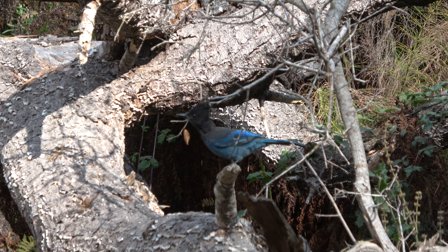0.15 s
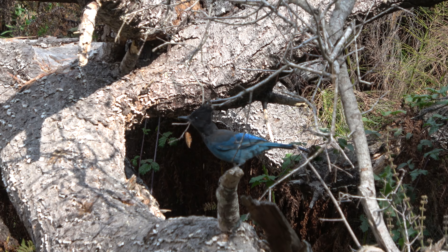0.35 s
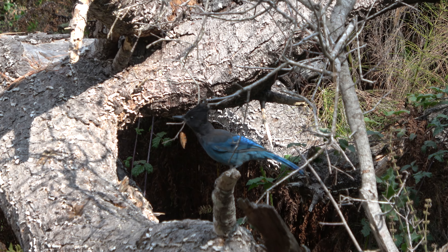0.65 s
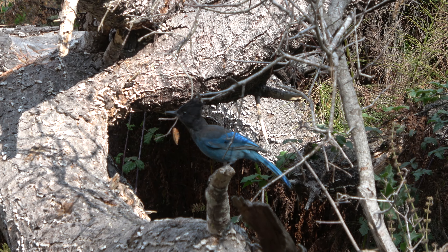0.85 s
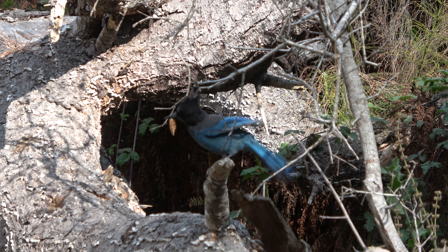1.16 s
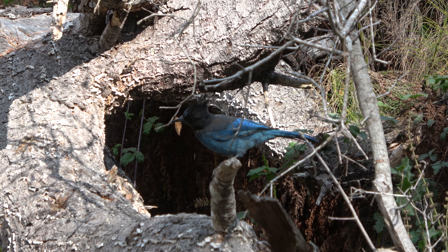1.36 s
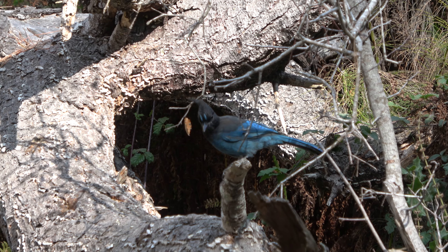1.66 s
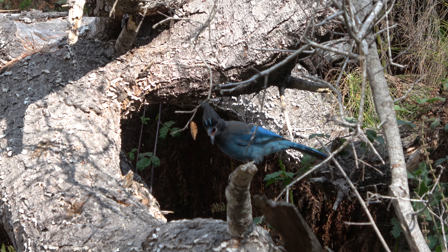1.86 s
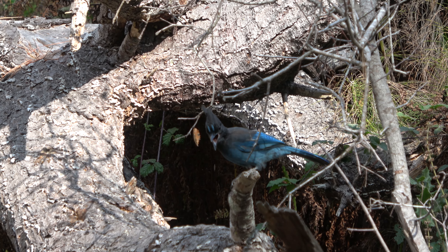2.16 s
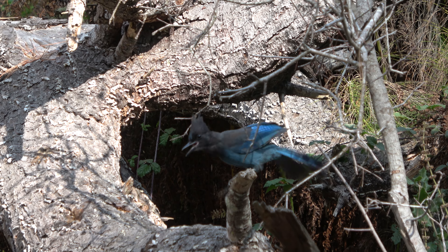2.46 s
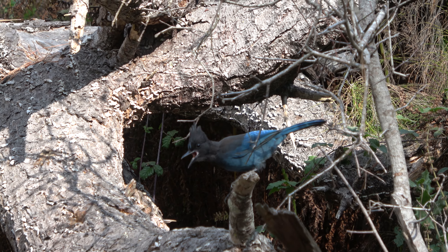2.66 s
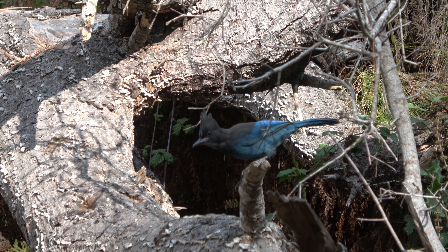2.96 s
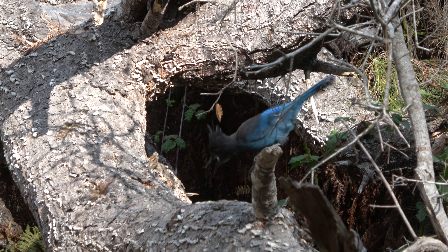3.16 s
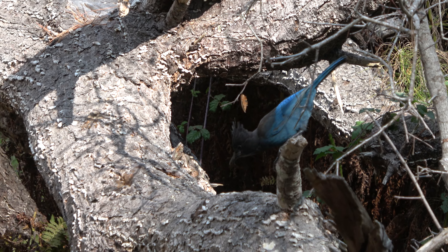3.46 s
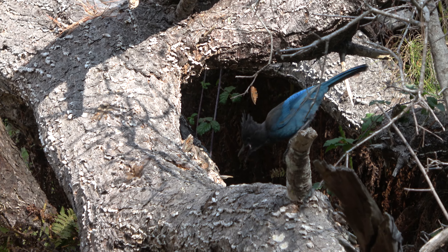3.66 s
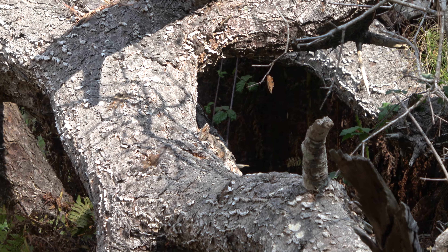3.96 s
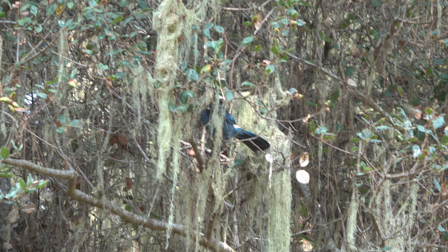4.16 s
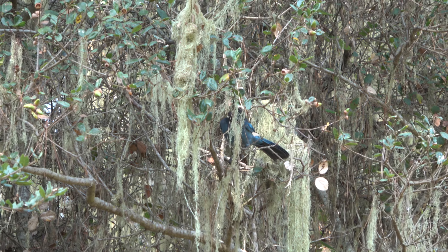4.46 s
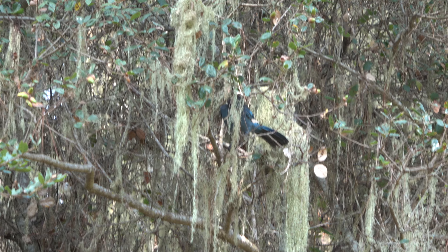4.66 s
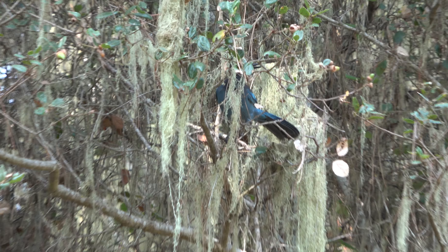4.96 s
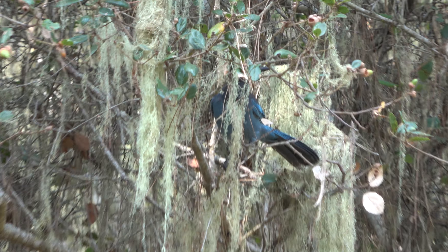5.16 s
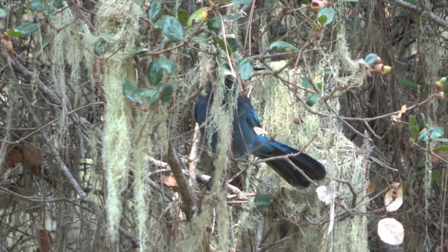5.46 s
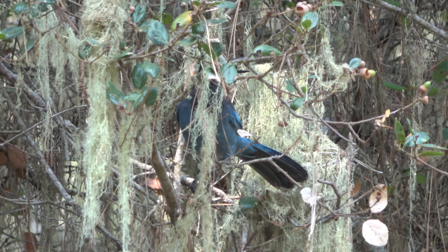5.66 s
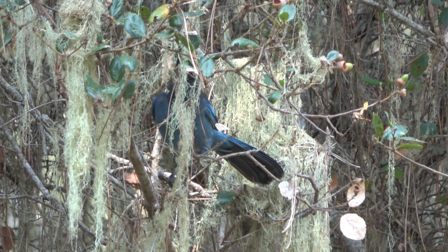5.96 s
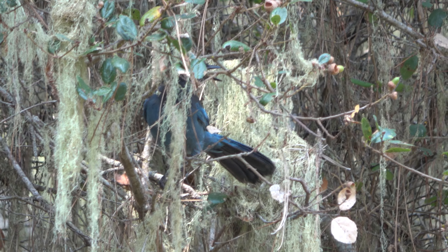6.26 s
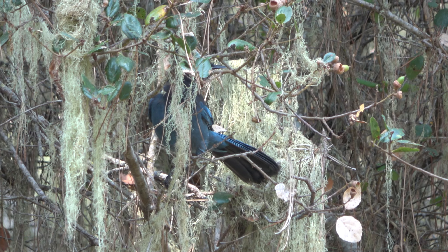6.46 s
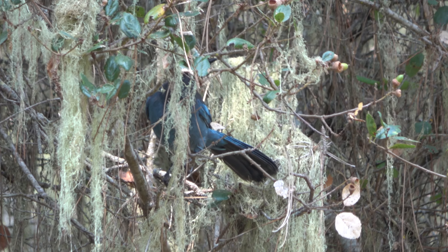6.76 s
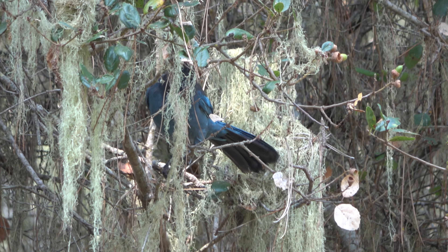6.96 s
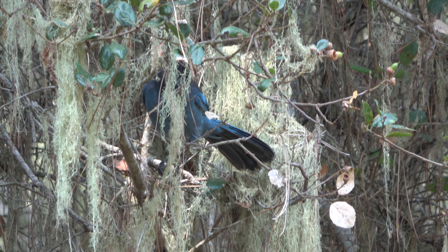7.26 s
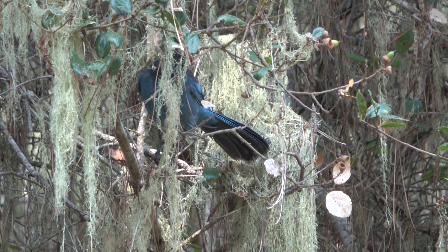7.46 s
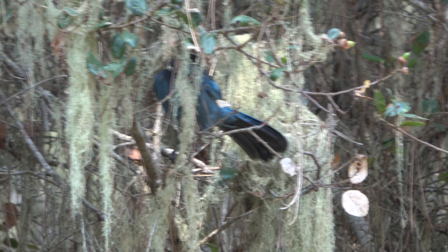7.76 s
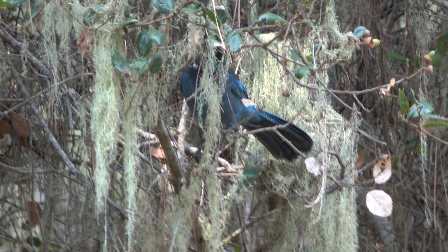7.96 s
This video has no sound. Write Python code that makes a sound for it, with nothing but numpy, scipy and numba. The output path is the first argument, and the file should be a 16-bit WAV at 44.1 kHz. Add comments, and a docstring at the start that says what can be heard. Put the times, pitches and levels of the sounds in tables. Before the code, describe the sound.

A jay gives four harsh, rattling rasps close by, then six softer ones from farther off in a forest over faint traffic rumble and engine drone.

```python
"""A jay rasps four times from a perch in a hollow log, then six times from a lichen-hung tree further off.
Its syrinx (voice organ) snaps about a thousand times a second, in bursts that flutter near 120 a second.
Windpipe, gullet, throat and beak ring to these snaps and to breath noise, and the trees echo each call.
Behind it lie far traffic made of filtered noise, a droning engine of two gliding tones, faint ticks
(ringing noise bursts) and chirps (gliding tones), and microphone hiss."""
import sys
import numpy as np
from scipy import signal
from scipy.fft import rfft, irfft, next_fast_len
from scipy.io import wavfile
from scipy.ndimage import uniform_filter1d
from numba import njit

SR = 44100
rng = np.random.default_rng(int(sys.argv[2]) if len(sys.argv) > 2 else 0)


def digitize_waveform(pressure):
    """Quantize a signal to 16-bit integers and store it at the path in sys.argv[1].

    Rows of a 2-D input are taken as channels; values are limited to [-1, 1].
    """
    field = np.atleast_2d(pressure).T
    bounded = np.clip(field, -1, 1)
    quanta = np.round(bounded * 32767).astype(np.int16)
    wavfile.write(sys.argv[1], SR, quanta)


N = 358091
T = np.arange(N) / SR
SCENE_CHANGE_S = 4.092  # before this we hear the log, from then on the tree
LEFT_RIGHT = np.array([[1], [-1]])  # a side signal is added on the left and subtracted on the right


def undb(db):
    """Turn dB into a gain."""
    return 10 ** (np.asarray(db) / 20)


def level(x, db):
    """Scale a sound to an rms level in dB."""
    return x * undb(db) / np.sqrt(np.mean(x ** 2))


def colour(x, points):
    """Filter by a gain curve drawn through (f/Hz, gain/dB) points."""
    hz, db = np.transpose(points)
    size = next_fast_len(x.shape[-1])
    f = np.arange(size // 2 + 1) * SR / size + 1  # 1 Hz up, so that the log exists
    gain = undb(np.interp(np.log(f), np.log(hz), db))
    return irfft(rfft(x, size) * gain, size)[..., :x.shape[-1]]


@njit
def svf(x, hz, width):
    """State-variable band-pass filter: its centre may move, and the gain there is 1."""
    y, b, l = np.empty(len(x)), 0., 0.
    for i in range(len(x)):
        g, k = np.tan(np.pi * hz[i] / SR), width / hz[i]
        v = (b + g * (x[i] - l)) / (1 + g * (g + k))
        b, l, y[i] = 2 * v - b, l + 2 * g * v, k * v
    return y


def ring(x, hz, width):
    """A steep resonance of unit rms: two band-passes in a row, the second twice as wide."""
    hz = hz + np.zeros(len(x))
    once = svf(x, hz, 1. * width)
    return level(svf(once, hz, 2. * width), 0)


def walk(rate, count=N):
    """A smooth random wander with a spread near 1: new values at this rate per second, averaged twice."""
    hold = int(SR / rate)
    steps = np.repeat(rng.standard_normal(count // hold + 3), hold)
    smooth = uniform_filter1d(uniform_filter1d(steps, hold), hold)
    return 1.333 * smooth[hold:hold + count]


def jay():
    """The dry calls: each is a burst of breath through the voice organ, added at its own time."""
    # one row a call; the ring levels are against the throat:
    # start t/s, length t/s, level at the peak/dB, place of the peak (0-1), sag by the end level/dB,
    # flutter f/Hz, windpipe f/Hz, throat f/Hz, beak f/Hz, windpipe level/dB, gullet level/dB, beak level/dB
    calls = [ (1.802, 0.53, -23.5, 0.52, -2, 120.2, 1867, 3980, 5580, -10, -2, 4),
             (2.517, 0.34, -25, 0.58, -1, 127.9, 1956, 4080, 5380, -8.5, -1.5, 1.5),
             (3.129, .338, -25, 0.73, -1.5, 122.4, 2091, 4000, 5170, -4.5, -3, 2),
             (3.683, 0.33, -24, 0.68, -5, 122.9, 2084, 3990, 5270, -4.5, -4.5, 2.5),
             (3.96, 0.41, -29, 0.14, -7, 118, 1696, 3940, 5460, -18, 3.5, 4.5),
             (4.58, .46, -31, 0.5, -7, 119.6, 1726, 4140, 5570, -20, 3.5, 3),
             (5.361, 0.47, -31.5, 0.5, -6, 118.7, 1678, 4220, 5590, -17, 2.5, 3),
             (6.115, .416, -32.5, 0.32, -6, 116.2, 1716, 4100, 5600, -15, 3, 3.5),
             (6.97, 0.44, -28.5, .58, -5, 114.3, 1780, 3990, 5660, -23, 1.5, 2.5),
             (7.674, 0.41, -28.5, 0.51, -2.5, 121.1, 1755, 4300, 6100, -18, 1.5, 3.5), ]
    out = np.zeros(N)
    for call in calls:
        i, sound = rasp(*call)
        out[i:i + len(sound)] += sound
    return out


def rasp(start_s, length_s, peak_db, peak_at, sag_db, flutter_hz, pipe_hz, throat_hz, beak_hz,
         pipe_db, gullet_db, beak_db):
    """One call: snaps and breath noise ring the airways; returns its start sample and its sound."""
    # drift from mid-call, [tree, log][early, late]:
    # flutter f/Hz, throat f/Hz, beak f/Hz, windpipe level/dB, gullet level/dB, beak level/dB
    drift = ( ((10, 200, 50, 9.5, -1, 1), (-13, 22, -30, 1.5, 2, -.5)), ((-3, 150, 330, 2.5, -4.5, -1),
             (-10, 11, 260, -3, 2, -4.5)), )
    # ring widths in the tree, then in the log: windpipe f/Hz, gullet f/Hz, throat f/Hz, beak f/Hz
    ring_widths = ((220, 900, 900, 1200), (300, 480, 480, 1050))
    # colour of the rasp between and above its rings, on each perch: f/Hz, level/dB per Hz
    log_colour = [(900, -31), (1500, -12), (2400, -34), (3450, -14), (4700, -40), (6400, -6), (7000, -15.5),
                  (8000, -9.5), (9000, -12.5), (16000, -31)]
    tree_colour = [(5000, -14.5), (6400, -28), (7200, -11.5), (8500, -9), (10500, -16), (16000, -30)]
    # in each pair below the tree comes first, then the log
    gullet_hz, chest_db = (2553, 2787), (-27, -18.5)
    pipe_rise, pipe_rise_s = .13, .045  # the windpipe starts this share low and opens
    wander, patchy_db = .012, 1.2  # rings wander by about this share and flicker by about this many dB

    in_log = int(start_s + length_s < SCENE_CHANGE_S)
    t = np.arange(int(start_s * SR), min(int((start_s + length_s) * SR), N)) / SR
    age = t - start_s
    thirds = start_s + length_s * np.array([1, 3, 5]) / 6  # the middle of each third of the call
    middle = (flutter_hz, throat_hz, beak_hz, pipe_db, gullet_db, beak_db)
    flutter_hz, throat_hz, beak_hz, pipe_db, gullet_db, beak_db = (
        m + np.interp(t, thirds, (early, 0, late)) for m, early, late in zip(middle, *drift[in_log]))
    pipe_hz = pipe_hz * (1 - pipe_rise * np.exp(-age / pipe_rise_s))

    # the windpipe rings on the second harmonic of the snaps
    chance = rng.standard_normal((len(t) // 10, 3)).T
    uneven_flutter_hz = flutter_hz * (1 + .012 * walk(25, count=len(t)))
    stretch, size = np.clip(1 + .16 * chance[0], .4, 2), undb(1.5 * chance[1])
    snaps, phase = syrinx(pipe_hz / 2, uneven_flutter_hz, stretch, size, 1 + .008 * chance[2])
    breath = level(rng.standard_normal(len(t)), -3)
    opening = level(np.diff(phase, prepend=phase[0]).clip(max=0), 0)  # one clean pulse a flutter cycle
    source = flutter_gate(phase, age, in_log) * (breath - level(snaps, 0)) + undb(-14) * opening

    sound = 0
    centres, levels = (pipe_hz, gullet_hz[in_log], throat_hz, beak_hz), (pipe_db, gullet_db, 0, beak_db)
    for k, (hz, width, db) in enumerate(zip(centres, ring_widths[in_log], levels)):
        flicker = undb(db + patchy_db * walk(14.2, count=len(t)))
        moving_hz = hz * (1 + wander * walk(9.26, count=len(t)))
        sound = sound + (-1) ** k * flicker * ring(source, moving_hz, width)  # neighbours swing in opposition
    sound = sound + colour(level(source, 12.5), (tree_colour, log_colour)[in_log])
    # a chest tone below the windpipe
    chest = undb(chest_db[in_log] + 2 * patchy_db * walk(14, count=len(t)))
    sound = sound + chest * ring(opening, .58 * pipe_hz, 260)
    # clean partials just under the windpipe
    sound = sound + undb(pipe_db - 7) * ring(opening, .85 * pipe_hz, 650)
    sound = sound + head_swing(source, t, in_log)

    edge = np.clip(np.minimum(t - t[0], t[-1] - t) / .003, 0, 1)
    heard = 1 if in_log else np.clip((t - SCENE_CHANGE_S) / 0.008, 0, 1)  # the scene changes here: the tree call is heard only from the change on, mid-call
    loudness = undb(peak_db + effort(age, length_s, peak_at, sag_db, in_log))
    return int(start_s * SR), -level(sound, 0) * loudness * edge * heard


@njit
def syrinx(snap_hz, flutter_hz, stretch, size, slip):
    """Air snaps the voice organ unevenly; each flutter cycle, itself uneven, restarts the snaps."""
    snaps, phase = np.zeros(len(snap_hz) + 1), np.empty(len(snap_hz))
    p, q, k, c = 0., 0., 0, 0  # snap phase, flutter phase, snap count, flutter count
    for i in range(len(snap_hz)):
        step = snap_hz[i] * stretch[k] / SR
        p += step
        q += flutter_hz[i] * slip[c] / SR
        if q >= 1:
            q, c, p = q - 1, c + 1, 1.
        if p >= 1:
            p, k = p - 1, k + 1
            # share the snap between two samples, so that it can fall between them
            snaps[i] += size[k] * p / step
            snaps[i + 1] += size[k] * (1 - p / step)
        phase[i] = q
    return snaps[:-1], phase


def flutter_gate(phase, age, in_log):
    """The flutter chops the voice: the gap between bursts is deep as the call sets in, then fills."""
    extra_gap_db, held_gap_db, open_share = 26, 2, .33
    fill_s = (.065, .048)[in_log]
    gap_db = held_gap_db + extra_gap_db * np.exp(-(age / fill_s) ** 2)
    return undb(-gap_db * np.clip((phase - open_share) / .15, 0, 1))


def head_swing(source, t, in_log):
    """In the log the bird swings its head down once and one narrow ring falls in pitch."""
    # path of the falling ring: t/s, f/Hz, level/dB
    swing = [(3.8, 4400, -9), (3.87, 3850, 0), (3.93, 3150, -1), (3.965, 2620, -1), (3.978, 2550, 5),
             (3.99, 2500, -6)]
    at, hz, db = np.transpose(swing)
    swing_db = np.interp(t, at, db, left=-99, right=-99) - 99 * (1 - in_log)  # -99 dB: as good as silent
    return undb(swing_db) * ring(source, np.interp(t, at, hz), 120)


def effort(age, length_s, peak_at, sag_db, in_log):
    """Effort of the call in dB against its peak: attack, rounded swell, rounded sag, release."""
    onset_db, attack_db = -36, -5.5  # at the first sound, then after the attack
    attack_s = (0.053, 0.055)[in_log]
    release_s, release_db = .04, -20.5
    top_s = peak_at * length_s
    swell = attack_db * np.clip((top_s - age) / (top_s - attack_s), 0, 1) ** 2.0
    sag = sag_db * np.clip((age - top_s) / (length_s - release_s - top_s), 0, 1) ** 2.8
    attack = (onset_db - attack_db) * np.clip(1 - age / attack_s, 0, 1) ** 1.75
    release = release_db * np.clip(1 - (length_s - age) / release_s, 0, 1)
    return swell + sag + attack + release


def near_echoes(x):
    """Bark and leaves close to the bird scatter it within milliseconds, a little differently to each side."""
    # how wide the scatter is: f/Hz, side minus mid level/dB
    near_width = [(1000, -56), (2500, -40), (4400, -17.5), (8000, -10), (15000, -14)]
    t = np.arange(1500) / SR
    mid, side = rng.standard_normal((2, len(t))) * np.exp(-t / 0.023)
    mid = mid * undb(-5.5) / np.sqrt(np.sum(mid ** 2))
    mid[0] = 1  # the direct sound
    mid, side = (signal.fftconvolve(x, h / np.sqrt(np.sum(h ** 2)))[:N] for h in (mid, side))
    return mid + colour(side, near_width) * LEFT_RIGHT


def forest(x):
    """Trunks return a long tail of echoes; leaves swallow its treble sooner."""
    decay_s = 0.76  # time to fall by 60 dB, before each band takes its share
    log_db, tree_db = -24, -20
    t = np.arange(SR) / SR
    tail = 0
    for hz, share in [(1500, 1.23), (3200, 0.8), (4500, 0.94), (6500, 0.7), (10000, 0.56)]:
        band = np.array([ring(rng.standard_normal(SR), hz, hz / 2) for _ in range(2)]) * np.sqrt(hz)
        tail = tail + band * undb(-60 * t / (decay_s * share))
    tail = (tail[0] + undb(-19.5) * tail[1] * LEFT_RIGHT) * np.clip(t / 0.065, 0, 1)
    tail = tail / np.sqrt(np.sum(tail ** 2) / 2)
    at_log = T < SCENE_CHANGE_S
    log = undb(log_db) * signal.fftconvolve((x * at_log)[None], tail)[:, :N]
    tree = undb(tree_db) * signal.fftconvolve((x * ~at_log)[None], tail)[:, :N]
    return log * at_log + tree


def far_traffic():
    """Distance leaves a nearly centred rumble of noise that swells slowly, louder at the tree."""
    # colour of the rumble at the log and at the tree: f/Hz, level/dB per Hz
    log_rumble = [(12, -33), (20, 0), (48, -7), (167, -6), (193, -7), (424, -7.5), (539, -11), (593, -9.5),
                  (1000, -20.5), (1240, -16), (1370, -20.5), (6000, -47), (7800, -62), (13200, -120)]
    tree_rumble = [(12, -39), (20, -2.5), (159, -5), (198, -1.5), (239, -4.5), (304, -2), (456, -9),
                   (717, -9.5), (889, -11.5), (6000, -38.5), (7800, -73), (13200, -120)]
    # balance of the ears: f/Hz, left minus right level/dB
    ear_balance = [(40, -3), (110, -3.5), (250, -1), (450, .5), (1300, -2)]
    # how wide the rumble is: f/Hz, side minus mid level/dB
    far_width = [(25, -34), (45, -26), (70, -19), (250, -14), (600, -16.5)]
    log_db, tree_db = -45, -43  # rms, before the slow swell
    mid, side = rng.standard_normal((2, N))
    pair = mid + colour(side, far_width) * LEFT_RIGHT
    pair = np.array([colour(ear, [(hz, sign * db / 2) for hz, db in ear_balance])
                     for ear, sign in zip(pair, (1, -1))])
    log = level(colour(pair, log_rumble), log_db)
    tree = level(colour(pair, tree_rumble), tree_db)
    return np.where(T < SCENE_CHANGE_S, log, tree) * undb(.7 * walk(1.5))


def drone():
    """At the tree, two slowly rising engine tones waver on the way through the air."""
    # path of each of the two tones, before the waver: t/s, f/Hz, rms level/dB
    tone_paths = [
        [(4.1, 184.6, -49), (4.5, 186.8, -47), (5.3, 191.5, -53), (5.8, 193.3, -80), (6.45, 193.4, -45),
         (8.12, 200, -57)],
        [(4.1, 296, -52), (4.6, 300.9, -52.5), (8.12, 323.3, -51)],
    ]
    out = 0
    for s, hz, db in map(np.transpose, tone_paths):
        wavering_hz = np.interp(T, s, hz) + 1.47 * walk(12)
        tone = np.sin(2 * np.pi * np.cumsum(wavering_hz) / SR)
        wavering_db = np.interp(T, s, db) + 0.72 * walk(5.4)
        out = out + np.sqrt(2) * tone * undb(wavering_db)
    return out * (T >= SCENE_CHANGE_S)


def small_sounds():
    """Twigs tick as dying noise rings, and small birds far off chirp as gliding tones."""
    # ticks: t/s, level before the decay/dB, f/Hz, ring width f/Hz
    twig_ticks = [(0.099, -59, 6470, 6000), (.752, -65, 7000, 2500), (6.63, -54, 5660, 1500),
                  (6.63, -65.5, 10300, 2500), (6.742, -62, 10500, 2545)]
    # chirps: t/s, length t/s, from f/Hz, halfway f/Hz, to f/Hz, peak level/dB
    bird_chirps = [(.31, .1, 5400, 5400, 5350, -73), (.5, 0.071, 2150, 2500, 2350, -67),
                   (.95, .1, 2200, 2600, 2650, -66), (1.12, 0.137, 2500, 2900, 2850, -64),
                   (1.28, .035, 6550, 6550, 6500, -67), (1.6, .04, 2850, 2750, 2650, -61),
                   (1.65, .06, 2700, 2750, 2750, -81)]
    out, t = np.zeros(N), np.arange(600) / SR
    for s, db, hz, width in twig_ticks:
        tick = ring(rng.standard_normal(len(t)), hz, width) * np.exp(-t / 0.009)
        out[int(s * SR):][:len(t)] += undb(db) * tick
    for s, length, *hz, db in bird_chirps:
        count = int(length * SR)
        glide_hz = np.interp(np.linspace(0, 2, count), (0, 1, 2), hz)
        chirp = np.hanning(count) * np.sin(2 * np.pi * np.cumsum(glide_hz) / SR)
        out[int(s * SR):][:count] += undb(db) * chirp
    return out


def scene():
    """The bird, its echoes and the background add up in the air."""
    bird = jay()
    pan_db = np.where(T < SCENE_CHANGE_S, 0.44, -0.4)  # left minus right: in the log, in the tree
    pan = undb(pan_db * LEFT_RIGHT / 2)
    return pan * near_echoes(bird) + forest(bird) + far_traffic() + drone() + small_sounds()


def record(dry):
    """Each microphone adds its own hiss; a steep filter cuts the top."""
    # colour of the hiss above 500 Hz: f/Hz, level/dB per Hz
    hiss_colour = [(2000, -71), (5000, 6.5), (8000, 7), (12000, 4), (16000, -1)]
    hiss_db, top_hz = -67, 15800  # the hiss level is rms, before the top is cut
    hiss = level(colour(rng.standard_normal(dry.shape), [(500, -46)] + hiss_colour), hiss_db)
    return signal.sosfilt(signal.ellip(14, .2, 80, top_hz, fs=SR, output="sos"), dry + hiss)


dry = scene()
out = record(dry)
digitize_waveform(out)
```